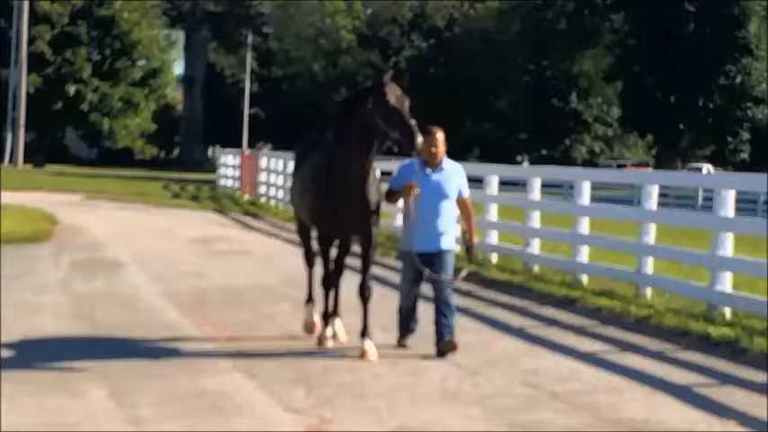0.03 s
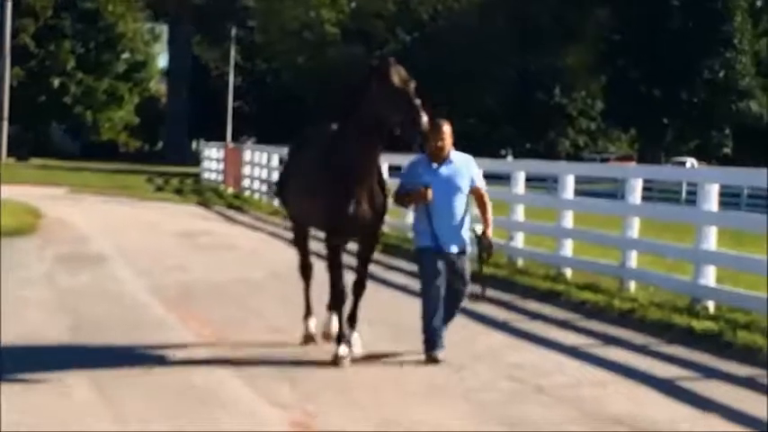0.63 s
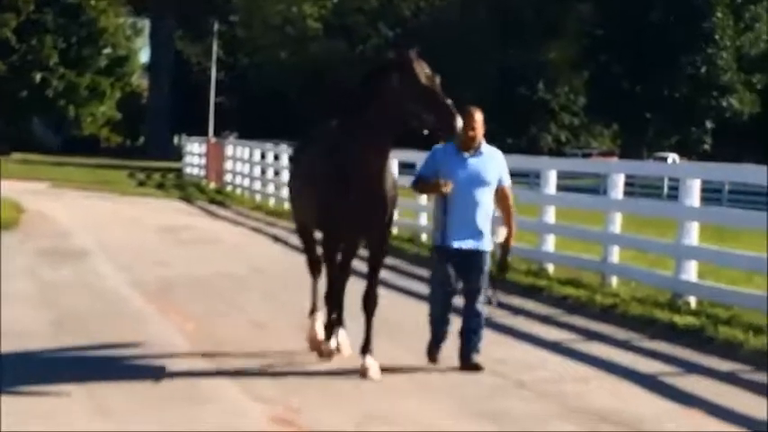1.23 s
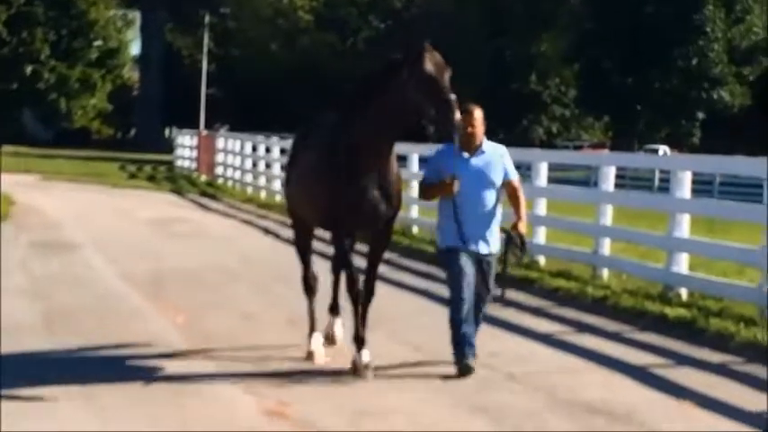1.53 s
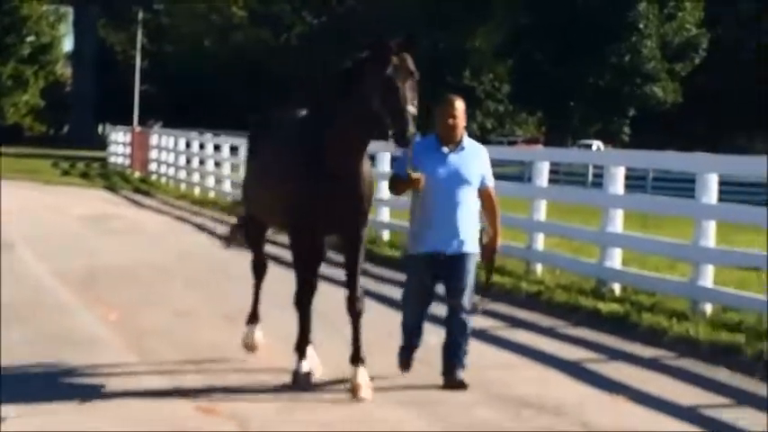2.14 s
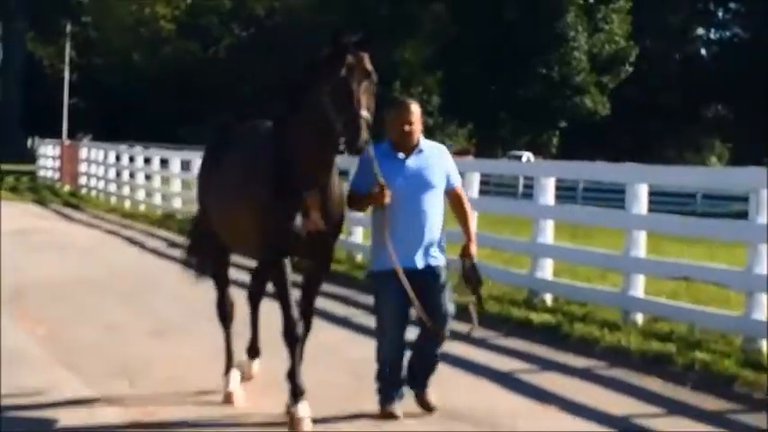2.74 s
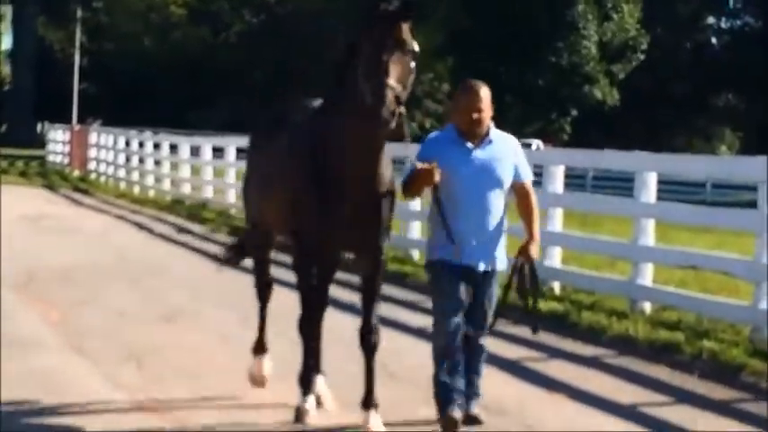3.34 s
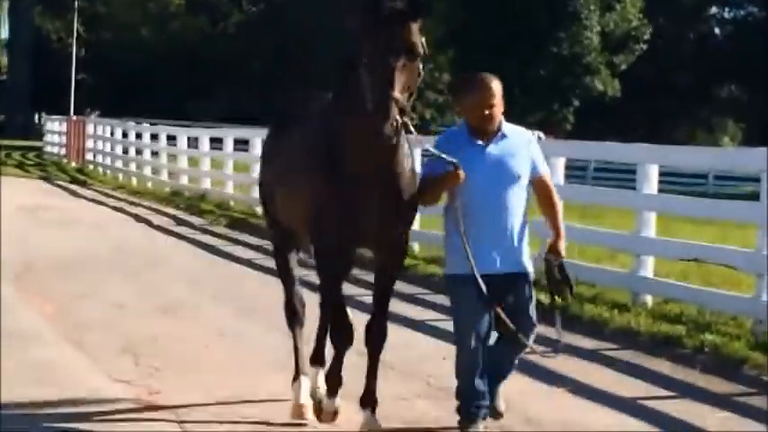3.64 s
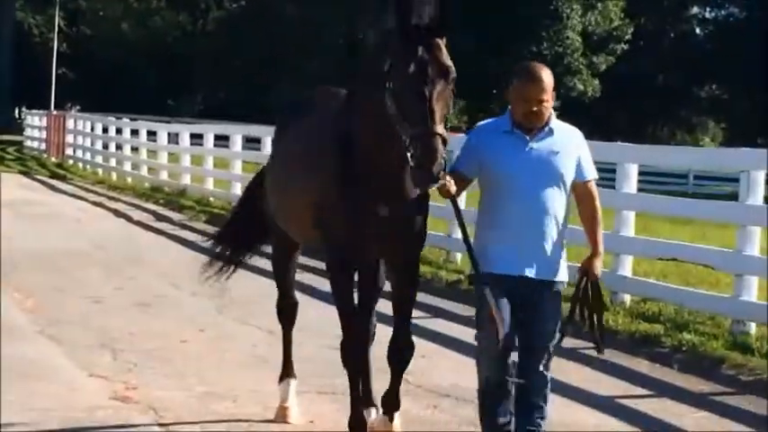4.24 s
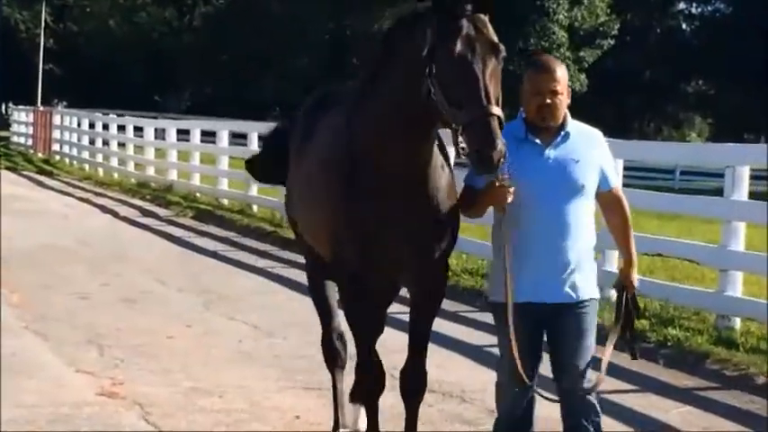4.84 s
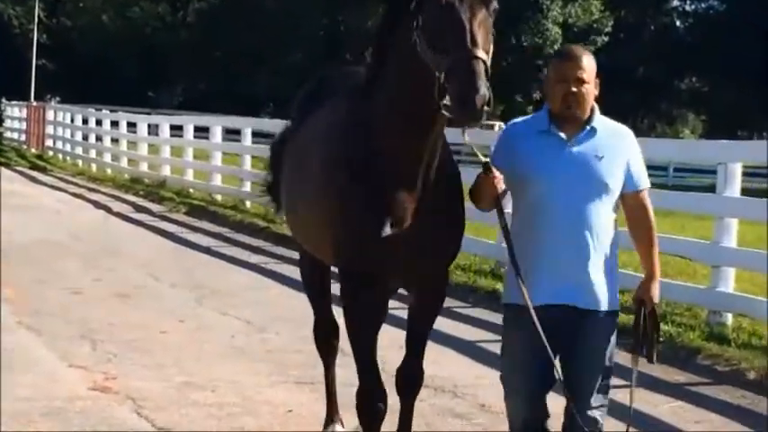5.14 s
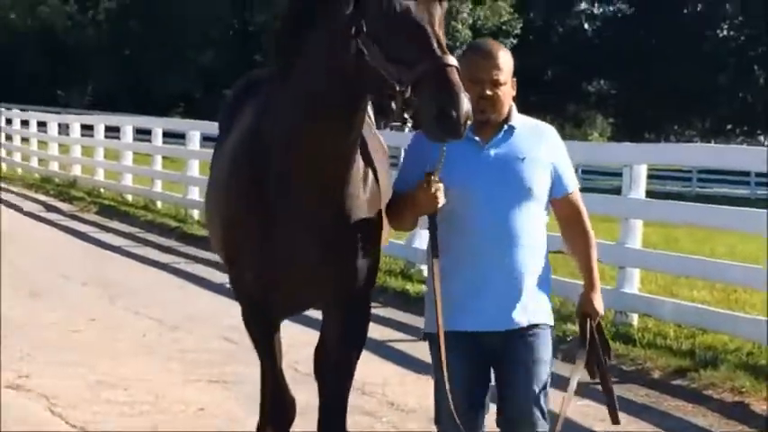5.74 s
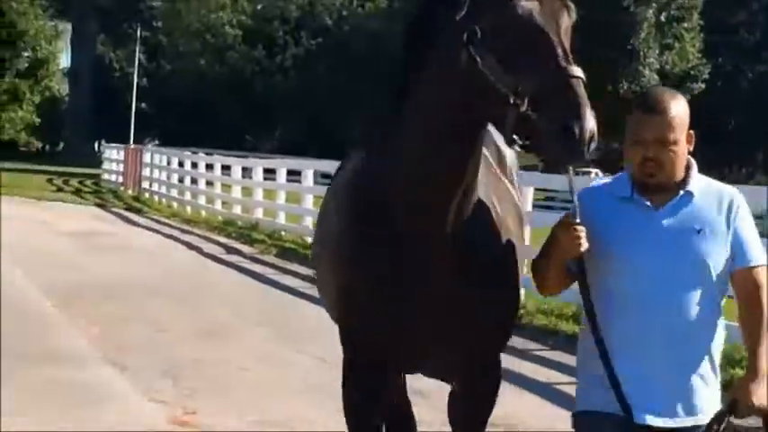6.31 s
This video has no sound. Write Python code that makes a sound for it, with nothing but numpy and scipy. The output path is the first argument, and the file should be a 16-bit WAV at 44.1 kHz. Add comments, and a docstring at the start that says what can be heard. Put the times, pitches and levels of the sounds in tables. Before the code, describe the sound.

A horse walks up a paved lane outdoors, its hooves clacking with a hollow ring about three times a second, some steps sharp and others faint. Feet scuff briefly on grit between them. Light wind rumbles and puffs on the microphone over softly rushing trees and a faint, far-off engine. Near the end the wind gives one strong thump, and the coat and lead rope rustle as the horse comes close.

```python
"""Trees rush softly, light wind puffs at the microphone, and a horse clops closer, led up a paved lane.
Each hoof lands toe first, then heel: its hard horn clacks on the pavement and the hollow under
the sole rings. Feet scuff on grit, and the coat and lead rope rustle as the horse comes close.
Behind it all, a far-off engine drones."""
import sys
import numpy as np
from scipy import signal
from scipy.fft import rfft, irfft, next_fast_len
from scipy.io import wavfile
from scipy.ndimage import uniform_filter1d, map_coordinates

SR = 44100
rng = np.random.default_rng(int(sys.argv[2]) if len(sys.argv) > 2 else 0)


def dump(signal):
    """Clip the signal to [-1, 1] and save it as 16-bit WAV at the path in sys.argv[1]."""
    limited = np.clip(np.atleast_2d(signal).T, -1, 1)
    pcm = np.round(limited * 32767).astype(np.int16)
    wavfile.write(sys.argv[1], SR, pcm)


N = 285327

# Levels are relative: the functions scale them further. A spectrum says how strong each frequency is.
# the rush of trees, and the even hiss under it: (frequency [Hz], level [dB])
TREE_SPECTRUM = [(30, -39.5), (100, -8), (300, -4.5), (450, -9.5), (750, -0.5), (1100, -0.5), (1600, -4.5),
                 (2500, -8), (3200, -19.5), (4200, -26), (5500, -40), (9000, -67)]
HISS_SPECTRUM = [(1000, -3.5), (4000, 0.5), (7000, 2), (10000, -1.5), (15000, -3.5)]
# the engine's low tones: (pitch [Hz], level [dB])
ENGINE_TONES = [(91.5, -56), (123.8, -55.5), (166.9, -58.5), (258.4, -68.5)]
# how well the air carries the engine: (time [s], level [dB])
ENGINE_CARRY = [(0.2, -9), (2.9, -10.5), (3.7, 2.5), (4.3, -4.5), (6.47, 3)]
# wind strength at the microphone: (time [s], level [dB])
WIND_LEVELS = [(.25, -47), (.65, -48.5), (.95, -40.5), (1.48, -52), (1.75, -42), (2.3, -47), (2.55, -51.5),
               (2.87, -43), (3.1, -51.5), (3.4, -44.5), (3.7, -49), (4, -44), (4.55, -49), (4.85, -42.5),
               (5.2, -48), (6.2, -44), (6.47, -41.5)]
# strong eddies (swirls of air) hitting the microphone: (time [s], level [dB], half length [s])
STRONG_EDDIES = [(.439, -28.5, 0.0014), (.5107, -28, 0.0024), (0.578, -32.5, .002), (1.1093, -32, 0.002),
                 (1.215, -33.5, 0.0028), (1.2507, -28, 0.0013), (1.396, -25, 0.0025),
                 (1.7443, -17, 0.00033), (1.965, -28.5, 0.0034), (2.1565, -23, 0.0012),
                 (2.3786, -31, 0.0019), (2.617, -32, 0.0018), (2.7502, -17, 0.0029), (2.7784, -27, 0.0029),
                 (2.8368, -25, 0.0032), (2.8986, -24.5, 0.0029), (4.074, -31.5, 0.0035),
                 (5.032, -31, .0029), (5.2435, -30, 0.0016), (5.6919, -3.5, 0.0015), (6.06, -29.5, 0.006),
                 (6.174, -26, 0.0032), (6.254, -33, 0.0049)]
# wind rumble, and the churning wake behind an eddy: (frequency [Hz], level [dB])
RUMBLE_SPECTRUM = [(20, -35), (40, -11.5), (70, -3), (100, 1), (150, -6), (210, -16), (300, -29),
                   (500, -42.5), (1200, -56), (4000, -120)]
WAKE_SPECTRUM = [(40, -33.5), (90, -4), (140, 12), (210, 6.5), (300, -16), (420, -14.5), (900, -31),
                 (3000, -120)]
# how strongly coat and rope rustle: (time [s], level [dB])
RUSTLE_LEVELS = [(5.6, -67), (5.85, -64.5), (6.0, -54), (6.1, -52.5), (6.25, -60), (6.47, -73)]
# the tone of that rubbing: (frequency [Hz], level [dB])
RUSTLE_SPECTRUM = [(100, -11.5), (250, -3), (450, 2.5), (650, 2.5), (950, -17), (1500, -37.5),
                   (4000, -19.5), (8000, -100)]
# coarse grit and fine sand under a foot: (frequency [Hz], level [dB])
GRIT_SPECTRUM = [(300, -45), (900, 10.5), (2000, 10.5), (3200, 12.5), (4300, -5.5), (6000, -33),
                 (12000, -59)]
SAND_SPECTRUM = [(2000, -19.5), (4500, 0), (7000, -7.5), (10000, -12), (15000, -24.5)]
# feet dragging over grit: (time [s], half length [s], rasp level [dB], hiss level [dB])
FOOT_SCUFFS = [(0.82, 0.0057, -57, -71), (1.654, 0.0096, -53.5, -60), (1.742, 0.0009, -43, -56),
               (1.828, 0.011, -68, -68), (1.903, 0.011, -51, -77), (2.004, 0.039, -59, -79),
               (3.035, 0.0028, -48, -59.5), (3.092, 0.0052, -53.5, -69.5), (4.141, 0.0058, -56, -69),
               (4.348, 0.011, -55.5, -86), (4.535, 0.0056, -50.5, -66), (4.874, 0.015, -65, -76),
               (5.103, .0041, -53, -60.5), (5.43, 0.0085, -62, -69.5), (6.21, 0.08, -80, -76)]
# how fast the lane's echo dies: (frequency [Hz], time to fade by 60 dB [s])
ECHO_FADE = [(300, 0.069), (1000, 0.078), (3000, 0.099), (10000, 0.02)]
# the pavement's dull thud: (frequency [Hz], width [Hz], level against the knock [dB])
PAVEMENT_RINGS = [(216, 61, -22), (587, 66, -18.5)]
# the hoof's wall, rim and edge: (frequency [Hz], width [Hz], level when flat [dB], level on the toe [dB])
HORN_RINGS = [(1635, 910, -8, -4.5), (2390, 440, -46, -2.5), (3190, 1090, -31.5, -11)]
# hoof landings; the knock is the leg's weight meeting the pavement, the cup is the hollow under the sole:
# (time [s], level [dB], tilt [0 flat to 1 on the toe], knock [dB], heel against toe [dB], cup pitch [Hz])
LANDINGS = [(0.233, -50.5, 0.91, -3.5, -2, 1180), (0.7881, -33.5, 0.8, -9.5, -5, 870),
            (1.099, -53.5, 0.88, 2.5, -4.5, 915), (1.339, -44.5, 0.84, -13, -3, 1220),
            (1.657, -46.5, 0.17, -9, -6, 1060), (1.893, -49.5, 0.48, -3.5, -3, 1180),
            (2.1978, -50.5, 0.7, -6, -8, 1140), (2.439, -41, 0.88, -7.5, -5, 1280),
            (2.766, -45, 0, -2.5, -10, 1070), (3.006, -43.5, 1, -1, 3.5, 1110),
            (3.018, -35.5, 1, -18, -11.5, 1340), (3.304, -55.5, 0.2, -6, -6, 1180),
            (3.575, -37, 0.94, -10.5, -2, 1120), (3.5932, -47.5, 0.36, -5.5, -7, 990),
            (3.9, -41.5, 0, -3.5, -10, 1100), (4.157, -44, 1, -2, -7, 1170),
            (4.467, -50, 0, -0.5, -9, 1090), (4.749, -28.5, 0.7, 6, -11, 905),
            (5.055, -51.5, 0.34, -0.5, -7.5, 984), (5.304, -39.5, 0.97, 1, -6.5, 1140),
            (5.31, -38, 0.74, -6, 5, 1070), (5.599, -42, 0, -1, -12.5, 1073),
            (5.872, -32, 0.67, -7.5, -5.5, 1160), (6.163, -46, 0.55, 2, -3.5, 1040),
            (6.434, -32.5, 0.87, -26, -15, 947), (6.436, -29, 0.72, -17, -4, 985)]


def amp(db):
    """Turn decibels into a number to multiply by."""
    return 10 ** (np.asarray(db) / 20)


def unit(x):
    """Scale x to an average strength (rms) of 1."""
    return x / np.sqrt(np.mean(x ** 2) + 1e-20)


def along(points, hz):
    """Read between (frequency, value) points on a log frequency scale."""
    frequencies, values = np.transpose(points)
    return np.interp(np.log(hz + 1), np.log(frequencies + 1), values)


def curve(rows):
    """Join (time, value) points into one value per sample."""
    return np.interp(np.arange(N) / SR, *np.transpose(rows))


def wobble(rate):
    """A smooth curve through `rate` random points a second."""
    knots = rng.standard_normal(int(N * rate / SR) + 4)
    steps = np.arange(8 * len(knots)) / 8
    smooth = map_coordinates(knots, [steps], mode="nearest")
    return np.interp(np.arange(N) * rate / SR, steps, smooth)


def filtered(x, response):
    """Multiply each frequency in x by response(hz)."""
    size = next_fast_len(N + SR // 2)
    return irfft(rfft(x, size) * response(np.fft.rfftfreq(size, 1 / SR)), size)[:N]


def coloured(x, spectrum):
    """Shape x with a spectrum table, at strength 1."""
    return unit(filtered(x, lambda hz: amp(along(spectrum, hz))))


def patchy(depth_db):
    """White noise that swells and sinks in patches of time and frequency."""
    noise = signal.stft(rng.standard_normal(N), nperseg=512)[2]
    patches = uniform_filter1d(rng.standard_normal(noise.shape), size=6, axis=0)
    patches = uniform_filter1d(patches, size=14, axis=1)
    return signal.istft(noise * amp(depth_db * unit(patches)), nperseg=512)[1][:N]


def add(track, s, sound):
    """Mix a sound into the track, starting at s seconds."""
    part = track[max(round(s * SR), 0):][:len(sound)]
    part += sound[:len(part)]


def trees(level_db=-54.5, sway_db=0.3, hiss_db=-77.0):
    """Trees rush steadily over a faint, even hiss."""
    rush = amp(level_db + sway_db * wobble(0.84)) * coloured(patchy(depth_db=1.85), TREE_SPECTRUM)
    return rush + amp(hiss_db) * coloured(rng.standard_normal(N), HISS_SPECTRUM)


def far_engine():
    """The low tones of a far-off engine waver on their way through the air."""
    t = np.arange(N) / SR
    tones = sum(amp(db) * unit(np.sin(2 * np.pi * hz * t + wobble(5.6))) for hz, db in ENGINE_TONES)
    return amp(curve(ENGINE_CARRY)) * tones


def breeze(gain_db=-2, gust_db=2, flutter_db=2):
    """Restless air flutters and rumbles on the microphone, following the gusts."""
    flutter = amp(gust_db * wobble(5.3) + flutter_db * wobble(40))
    rumble = coloured(rng.standard_normal(N), RUMBLE_SPECTRUM)
    return amp(curve(WIND_LEVELS) + gain_db) * unit(flutter * rumble)


def weak_eddies(count=8, over_wind_db=9, spread_db=2, half_s=0.0038):
    """Weak eddies come by chance, stronger in stronger wind: (time [s], level [dB], half length [s])."""
    levels = curve(WIND_LEVELS) + over_wind_db
    times = (np.arange(count) + rng.random(count)) / count * (N - 1) / SR
    return [(s, levels[int(s * SR)] + spread_db * rng.standard_normal(), half_s) for s in times]


def microphone_response(hz, cut_hz=66, damping=0.48, soft_hz=1100, dip_db=-6.5, dip_hz=400):
    """The microphone's bass cut makes a push of air swing back; its opening takes the edge off."""
    bass_cut = -hz ** 2 / (cut_hz ** 2 - hz ** 2 + 1j * damping * cut_hz * hz)
    dip = amp(dip_db * np.exp(-((hz - dip_hz) / 80) ** 2))
    return bass_cut * dip / np.sqrt(1 + (hz / soft_hz) ** 4)


def wind_puffs(push_db=1, crest_s=0.00046, trail_s=0.01005, wake_db=-16, wake_s=0.02):
    """Each eddy gives the microphone a rounded push of air inside a churning wake."""
    reach_s = .1
    t = np.arange(-reach_s, reach_s, 1 / SR)
    rounded = lambda half_s: 1 / (1 + (t / half_s) ** 2) ** 2
    pressure, wake = np.zeros(N), np.zeros(N)
    for s, db, half_s in STRONG_EDDIES + weak_eddies():
        start = s - reach_s
        add(pressure, start, amp(db) * rounded(half_s))
        # 2 * db: only a violent eddy has a clear sharp crest and a trail of weaker, slower eddies
        add(pressure, start, amp(2 * db - 2) * np.exp(-np.abs(t) / crest_s))
        for k in range(2):
            lag_s = (k + 1) * trail_s * 1.15 ** k
            add(pressure, start + lag_s, amp(2 * db - 6 * k) * rounded(0.0014 * 3 ** k))
        add(wake, start, amp(min(db, -24)) * np.exp(-np.abs(t) / wake_s))
    push = filtered(pressure, microphone_response)
    churn = coloured(rng.standard_normal(N), WAKE_SPECTRUM)
    return amp(push_db) * push + amp(wake_db) * wake * churn


def coat_and_rope(uneven_db=3):
    """The coat and lead rope rub softly and unevenly."""
    strength = amp(curve(RUSTLE_LEVELS) + uneven_db * wobble(35))
    return strength * coloured(rng.standard_normal(N), RUSTLE_SPECTRUM)


def sand_ticks(per_second=14, level_db=-93, spread_db=3):
    """Loose grains tick at random as they are kicked and crushed."""
    chance, size = rng.random(N), rng.standard_normal(N)
    ticks = (chance < per_second / SR) * amp(spread_db * np.clip(size, -2, 2))
    return amp(level_db) * coloured(ticks, SAND_SPECTRUM)


def scuffs(uneven_db=3.5, rasp_boost_db=3):
    """Grit rolls under a sliding foot: a short swell of uneven grains."""
    reach_s = .15
    t = np.arange(-reach_s, reach_s, 1 / SR)
    rasp, hiss = np.zeros(N), np.zeros(N)
    for s, half_s, rasp_db, hiss_db in FOOT_SCUFFS:
        swell = np.exp(-(t / half_s) ** 2 / 2)
        add(rasp, s - reach_s, amp(rasp_db + rasp_boost_db) * swell)
        add(hiss, s - reach_s, amp(hiss_db) * swell)
    grains = rng.standard_normal(N) * amp(uneven_db * wobble(900))
    return rasp * coloured(grains, GRIT_SPECTRUM) + hiss * coloured(grains, SAND_SPECTRUM)


def by_tilt(tilt, flat, on_toe):
    """Blend between the values for a flat landing and one on the toe."""
    return flat + np.clip(tilt, 0, 1) * (on_toe - flat)


def ring(modes, steepness, size=4096):
    """A struck thing rings in modes of (frequency [Hz], width [Hz], level [dB]); steeper sounds duller."""
    hz = np.fft.rfftfreq(size, 1 / SR)
    power = 0
    for centre, width, db in modes:
        detune = (hz ** 2 - centre ** 2) / (hz * width + 1)
        shape = (1 + detune ** 2) ** -.5 / (1 + (detune / 2) ** 2) ** (steepness / 2)
        power = power + (amp(db) * unit(shape)) ** 2
    energy = power * .03 * SR  # levels count as averages over 30 ms
    # folding the cepstrum (the log spectrum, taken back to time) puts all the ringing after the blow
    cepstrum = irfft(np.log(energy + 1e-12) / 2)
    fold = np.r_[1, np.full(size // 2 - 1, 2), np.zeros(size // 2)]
    return irfft(np.exp(rfft(cepstrum * fold)))


def lane_echo(rise_s=0.0023):
    """Legs, pavement and fence throw back a short echo, scaled to energy 1."""
    hz, t, noise = signal.stft(rng.standard_normal(SR // 5), SR, nperseg=128)
    fade = amp(-60 * t / along(ECHO_FADE, hz)[:, None])
    rise = 1 - np.exp(-(t / rise_s) ** 2)
    echo = signal.istft(noise * fade * rise, SR, nperseg=128)[1]
    return echo / np.linalg.norm(echo)


def sand_crunch(tilt, size, rise_s=0.0014, fade_s=.018):
    """Sand goes on crunching under the hoof while the weight settles."""
    t = np.arange(size) / SR
    crunch = rng.standard_normal(size) * np.exp(-t / fade_s) * (1 - np.exp(-t / rise_s))
    grain = ring([(6200, 8000, by_tilt(tilt, -99.5, -72))], steepness=2.6)
    return signal.fftconvolve(crunch / np.linalg.norm(crunch), grain)


def contact(roughness, fade_s, size=2048):
    """Horn meets rough pavement with one blow and a brief chatter, scaled to energy 1."""
    t = np.arange(size) / SR
    chatter = rng.standard_normal(size) * np.sqrt(t) * np.exp(-t / fade_s)
    force = roughness * chatter / np.linalg.norm(chatter) - (t == 0)
    return force / np.linalg.norm(force)


def hoof_ring(tilt, knock_db, cup_hz, knock_hz=780, knock_width_hz=400):
    """Hoof and pavement ring. A flat hoof seals air under its sole, so the cup rings louder and longer."""
    cup_width_hz, cup_db = by_tilt(tilt, 220, 300), by_tilt(tilt, 5, -5.5)
    cup = [(cup_hz, cup_width_hz, cup_db)]
    horn = [(hz, width, by_tilt(tilt, flat, on_toe)) for hz, width, flat, on_toe in HORN_RINGS]
    knock = [(knock_hz, knock_width_hz, knock_db)]
    pavement = [(hz, width, knock_db + db) for hz, width, db in PAVEMENT_RINGS]
    return ring(cup + horn + knock + pavement, steepness=by_tilt(tilt, 2.85, 2.24))


def hooves(heel_delay_s=.0056, echo_db=-3):
    """Each clop is a toe blow, a heel blow and a short echo, all ringing through hoof and pavement."""
    track = np.zeros(N)
    for s, db, tilt, knock_db, heel_db, cup_hz in LANDINGS:
        # a square landing is one clean blow; a rolling one has a stronger heel, more chatter and more echo
        force = amp(echo_db + 0.99 * heel_db) * lane_echo()
        add(force, 0, contact(roughness=1.28 * amp(heel_db / 2), fade_s=0.00069))  # the toe
        heel_s = heel_delay_s * rng.uniform(.9, 1.1)
        add(force, heel_s, amp(heel_db) * contact(roughness=0.84, fade_s=0.0017))
        ringing = hoof_ring(tilt, knock_db, cup_hz)
        clop = signal.fftconvolve(force, ringing)
        # toe, heel and echo share the energy of one landing
        add(track, s, amp(db) * clop * np.linalg.norm(ringing) / np.linalg.norm(clop))
        add(track, s, sand_crunch(tilt, len(force)))
    return track


def scene():
    """Horse, wind, trees and engine, mixed into one channel."""
    horse = hooves() + scuffs() + sand_ticks() + coat_and_rope()
    return (horse + wind_puffs() + breeze() + trees() + far_engine())[None]


def record(dry, start_s=.187, fade_in_s=.004, top_hz=15600):
    """The sound comes in after a moment of silence, with the highest treble cut off."""
    fade_in = np.clip((np.arange(N) / SR - start_s) / fade_in_s, 0, 1)
    return filtered(dry[0] * fade_in, lambda hz: hz < top_hz)[None]


dry = scene()
out = record(dry)
dump(out)
```